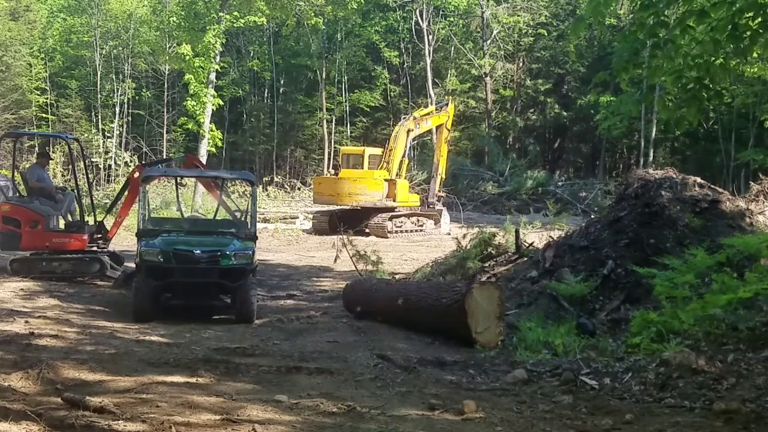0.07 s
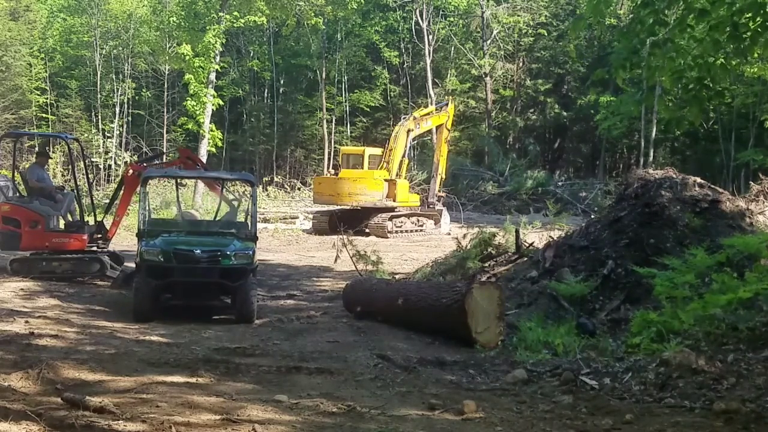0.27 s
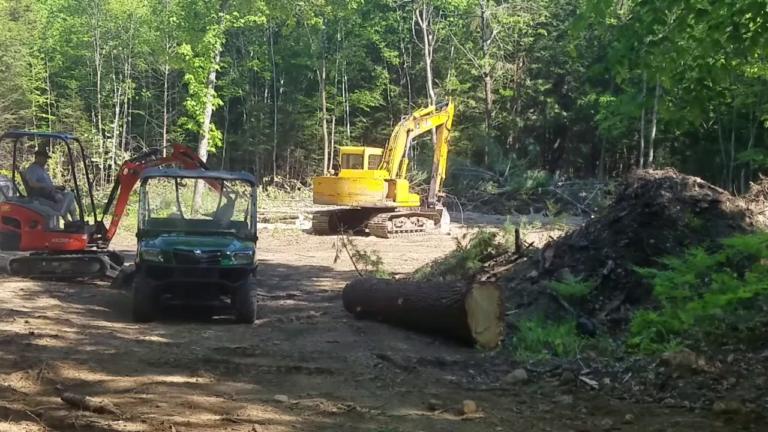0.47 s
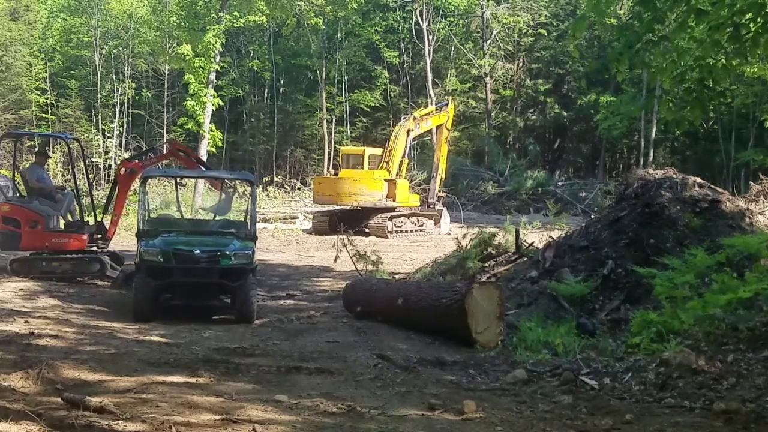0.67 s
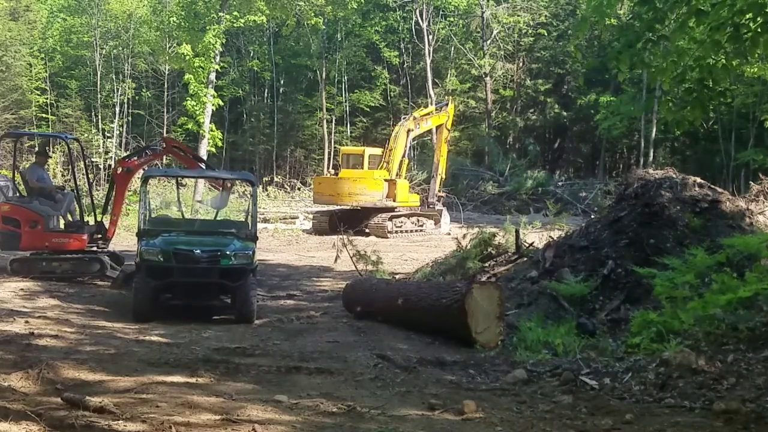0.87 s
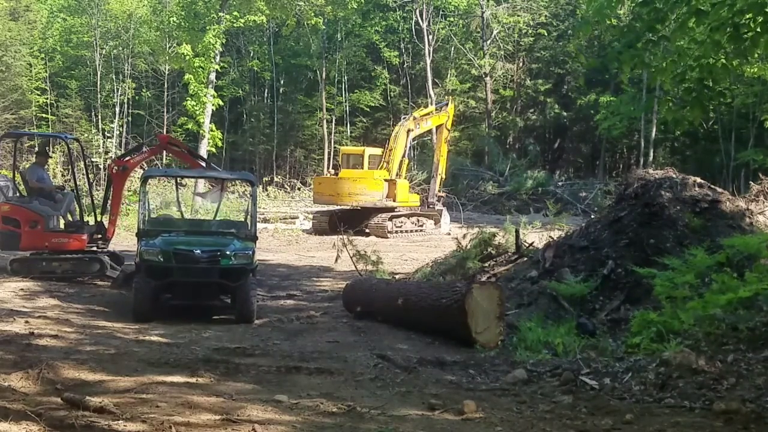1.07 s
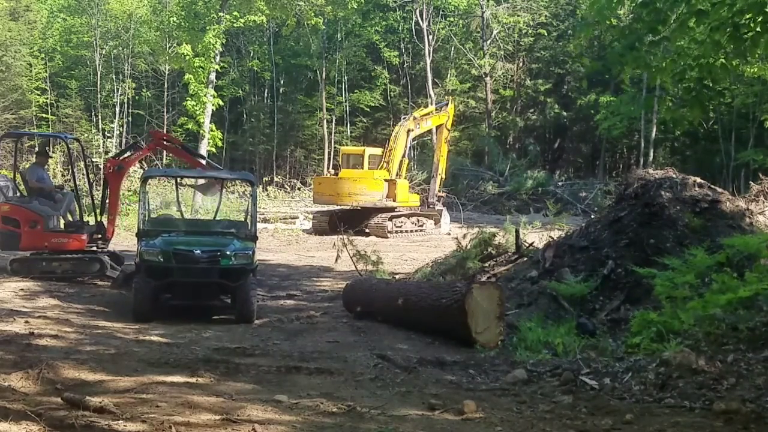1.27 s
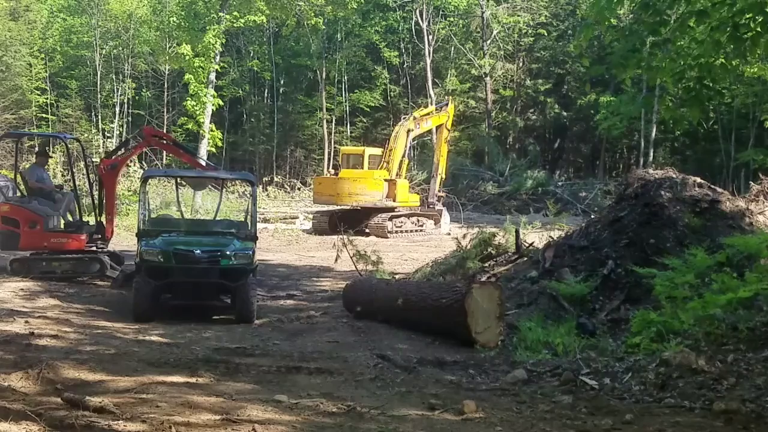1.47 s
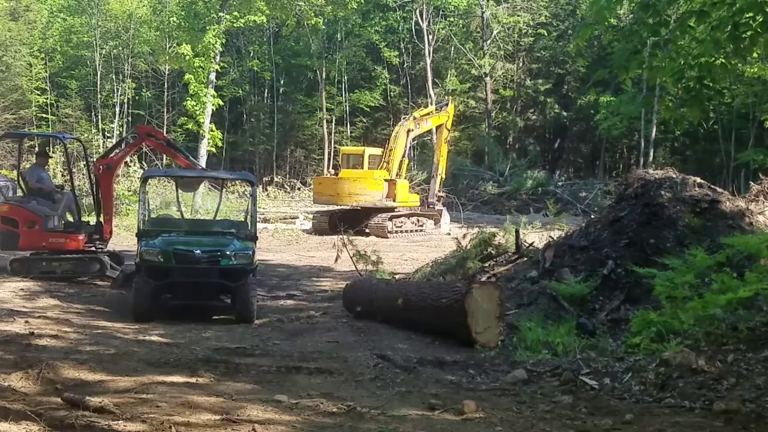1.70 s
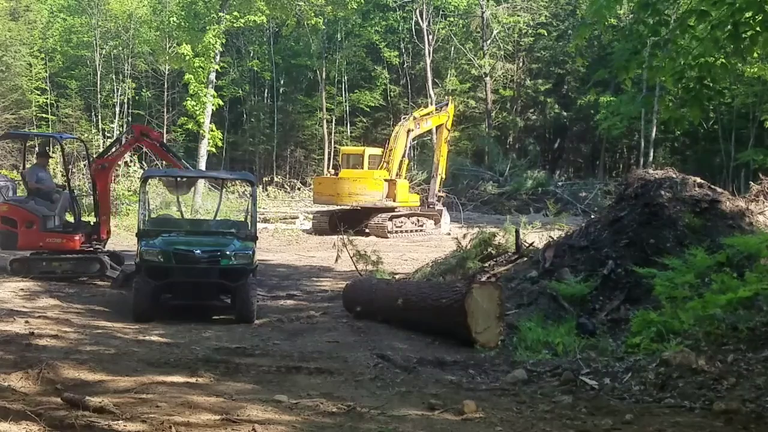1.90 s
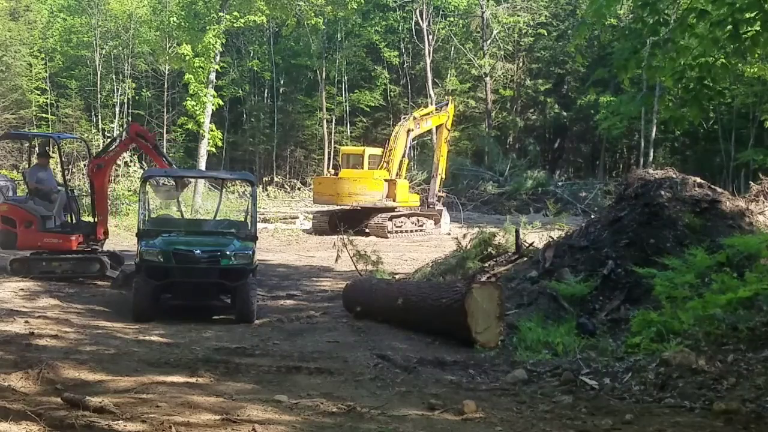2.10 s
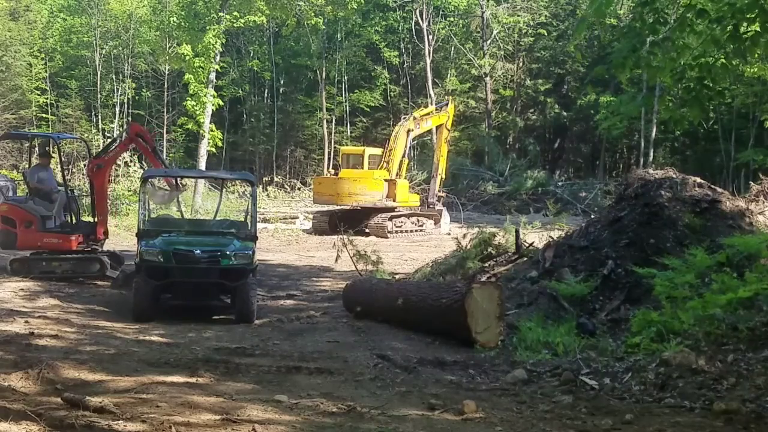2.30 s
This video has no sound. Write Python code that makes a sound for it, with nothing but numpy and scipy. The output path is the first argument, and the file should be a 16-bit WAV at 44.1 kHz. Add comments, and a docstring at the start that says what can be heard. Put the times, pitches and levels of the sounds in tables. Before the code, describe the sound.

A heavy log lands with a loud thud and weaker knocks, crushing brush. A few branches snap as it settles, while a diesel digger rumbles on in a forest clearing.

```python
"""A small diesel digger, off to the left in a forest clearing, drops a heavy log onto brush.
The log thuds, bounces and settles; branches crush and then snap one by one, and the trunks around scatter it all.
The engine runs on, sagging as the hydraulic pump takes up load; another idles further off."""
import sys
import numpy as np
from scipy import signal
from scipy.fft import rfft, irfft, next_fast_len
from scipy.io import wavfile
from scipy.ndimage import uniform_filter1d

SR = 44100
rng = np.random.default_rng(int(sys.argv[2]) if len(sys.argv) > 2 else 0)


def to_wav(sig):
    """Store sig (one row per channel, or 1-D mono) as 16-bit WAV at the path in sys.argv[1].

    Samples outside -1..1 are clipped; the rate is SR.
    """
    pcm = np.clip(np.atleast_2d(sig), -1, 1) * 32767
    pcm = np.round(pcm).astype(np.int16)
    wavfile.write(sys.argv[1], SR, pcm.T)  # frames by channels


N = 108045

# engine speed (s, firings per s)
SPEED = [(0, 65.6), (.55, 66.7), (.8, 63.3), (1.05, 63.5), (1.2, 64.6), (1.42, 63.7), (1.56, 61.4), (1.72, 60), (1.95, 59.8), (2.15, 61), (2.32, 58.5), (2.45, 57)]
# exhaust tones (multiple of the firing rate, dB)
EXHAUST = [(1, -42.5), (3, -37.5)]
# level of the second and fourth exhaust tones (s, dB, dB)
BOOM = [(0, -34.5, -36.5), (.6, -34.5, -32), (.82, -40.5, -38), (1.06, -32.5, -48), (1.2, -36.5, -33.5), (1.4, -30, -32), (1.55, -36, -31), (1.72, -33, -47.5), (1.9, -34.5, -31), (2.18, -31, -29.5), (2.29, -41, -38), (2.45, -37, -51)]
# hydraulic pump whine (s, dB)
PUMP = [(0, -68), (1.35, -68), (1.6, -47), (2.1, -45), (2.26, -53.5), (2.45, -49.5)]
PUMP_ORDER = 20 / 3  # fixed
# soft rumble of the exhaust, and the clatter of the block (Hz, dB per Hz)
RUMBLE = [(20, -5), (50, -2.5), (80, -2), (110, -4), (145, 1), (190, 2.5), (260, -1.5), (340, -2), (450, -13.5), (700, -27), (1500, -43)]
CLATTER = [(200, 1), (450, -1.5), (580, -13.5), (670, 7.5), (780, -6.5), (1030, 5.5), (1400, -8.5), (1600, 0.5), (2000, -5.5), (2900, -16), (4500, -15.5), (6500, -19), (11000, -19), (14000, -16.5)]
# tones of the far engine (multiple of its firing rate, dB)
IDLE = [(1, -45.5), (2, -46), (3, -49)]
IDLE_HZ = 51.26
# the log's blows (s, log dB, ground dB, pitch ratio of the spot that strikes)
BLOWS = [(.117, -7.5, -27.5, 1.015), (.140, -15.5, -15.5, 1.1), (.158, -15, -16, 1.18), (.198, -9.5, -19.5, .92), (.240, -10.5, -11.5, 1.02), (.285, -17, -19.5, 1.05), (.328, -22, -16, 1), (.375, -22, -28.5, 1.03), (0.441, -20, -28, .98), (0.516, -21.5, -17, 1), (0.621, -33.5, -22.5, 1.08), (.978, -30.5, -27, 1.15)]
# boom that the clearing returns (Hz, dB per Hz)
THUD_ECHO = [(30, -35.5), (60, -21), (85, 1), (150, -4.5), (240, 4), (330, -9.5), (430, -17.5), (550, -21.5), (800, -48.5), (2000, -58)]
SINK_S, THUD_BUILD_S = 0.0052, 0.013  # the log sinks into the brush; the boom builds up
# modes of the ground and of the log (Hz, dB, t60 s)
GROUND_MODES = [(88.8, -11.5, 0.51), (114.3, -3.5, 0.28)]
LOG_MODES = [(183.4, -9.5, 0.36), (239.2, 3, 0.16), (287.7, -5, 0.16), (332.5, -10, 0.22), (404, -21, 0.13), (519.3, -19, 0.21), (633.5, -22.5, 0.17)]
THUD_DB, THUD_ECHO_DB, THUD_T60_S = 2.5, -7, 0.92
# breaking branches (s, dB, level of the woody body dB)
SNAPS = [(0.132, -14.5, 8.5), (.165, -12, -2), (.222, -21, 0.5), (0.288, -21.5, 7.5), (0.619, -34, -9), (0.743, -37.5, -8.5), (.836, -16.5, -2), (0.987, -23.5, -25), (1.162, -20.5, -23), (1.406, -32, -19)]
# sharp crack and woody body of a snap (Hz, dB per Hz)
CRACK = [(300, -23.5), (1200, 5.5), (2000, 3), (2900, -2), (4400, 2.5), (6200, 0.5), (8000, 1.5), (11000, -10.5), (13000, -10.5), (16000, -15)]
WOOD = [(100, -16), (300, 20.5), (520, 7), (780, 0), (1030, 10), (1400, -14), (1900, -1.5), (2900, -6), (6000, -38), (14000, -43)]
SNAP_DB, SPLINTER_S, SPLINTERS_PER_S = 22, 0.042, 1800
# weight of the log on the brush (s, dB)
CRUSH = [(0, -41), (.05, -37.5), (.115, -37.5), (.15, -22.5), (.24, -25), (.33, -27), (.43, -30), (.53, -31.5), (.63, -40), (.72, -38.5), (.9, -39), (1.05, -49.5), (1.15, -53), (1.5, -61.5), (2.45, -76.5)]
BRUSH = [(150, -12), (350, 1.5), (520, 1), (780, -3.5), (1030, 1.5), (1400, -7), (2000, -5.5), (2900, -16), (4500, -14.5), (6500, -19), (11000, -30), (15000, -45)]
TWIGS_PER_S = 900
# thin metallic rings as the log shifts (s, Hz, dB)
RING_SWELL_S, RING_T60_S = 0.026, 0.52
# colour of the two microphones (Hz, left dB, right dB)
MICS = [(20.5, -3.5, -10.5), (101, 2.04, 5), (194, 0.34, -0.9), (716, -0.5, 5), (2320, 1, -0.5), (4300, -0.5, 3.5), (5180, 0.5, 2.5), (6330, 5, -7.5), (7300, -6.5, -13), (7830, -11.5, -30), (8740, -27, -35), (10000, -2.5, -22), (10730, 2, -9), (12400, -10.5, -27), (14500, -21, -13)]
PORT_LAG_S = 0.00036
TOP_HZ = 14500  # fixed
RUMBLE_DB, RUMBLE_PULSE, CLATTER_DB, CLATTER_PULSE = -36.5, 0.35, -45.5, 0.049
RINGS = [(0.594, 4520, -47.5), (0.999, 4550, -52), (1.18, 4443, -44), (1.415, 4480, -50)]
FOREST_T60_S, FOREST_BUILD_S, FOREST_HOLD_S, FOREST_GRAIN, DIRECT_DB = 0.53, 0.0046, 0.05, 0.53, -11
SHARED_HZ = 550  # below this the two close microphones hear the same wave


def undb(db):
    return 10 ** (np.asarray(db) / 20)


def unit(x):
    return x / np.sqrt(np.mean(x ** 2))


def curve(table, axis=1):
    """A column of a table, joined by straight lines in time."""
    rows = np.array(table, float)
    return np.interp(np.arange(N) / SR, rows[:, 0], rows[:, axis])


def colour(x, table, axis=1):
    """Causal filter through (Hz, dB) points."""
    rows, size = np.array(table, float), next_fast_len(2 * N)
    size += size % 2
    hz = np.maximum(np.arange(size // 2 + 1) * SR / size, 1)
    cep = irfft(np.log(undb(np.interp(np.log(hz), np.log(rows[:, 0]), rows[:, axis]))))
    cep[1:size // 2] *= 2
    cep[size // 2 + 1:] = 0
    return irfft(rfft(x, size) * np.exp(rfft(cep)))[..., :N]


def convolve(x, response):
    return signal.fftconvolve(np.atleast_2d(x), np.atleast_2d(response), axes=1)[:, :N]


def walk(rate):
    """Smooth random wander with a spread near 1."""
    k = int(SR / rate)
    return unit(uniform_filter1d(uniform_filter1d(np.repeat(rng.standard_normal(N // k + 1), k), k), k)[:N])


def from_left(x):
    """The sound reaches the right microphone a little later."""
    t = np.arange(N) / SR
    return np.array([x, np.interp(t - PORT_LAG_S, t, x, left=0)])


def echoes(t60, channels=2):
    """Countless reflections from trunks that build up, hold and die away; unit energy."""
    t = np.arange(N) / SR
    tail = rng.standard_normal((channels, N)) * np.exp(FOREST_GRAIN * rng.standard_normal((channels, N)))
    return unit(tail * (1 - np.exp(-t / FOREST_BUILD_S)) * undb(-60 * np.maximum(t - FOREST_HOLD_S, 0) / t60)) / np.sqrt(N)


def forest(x):
    """A weak direct path and the scatter from the trees."""
    return undb(DIRECT_DB) * from_left(x) + convolve(x, echoes(FOREST_T60_S))


def clicks(rate, spread_db):
    """Random fractures of uneven size; rms 1."""
    return unit((rng.random(N) < rate / SR) * rng.choice([-1, 1], N) * undb(spread_db * np.clip(rng.standard_normal(N), -2, 2)))


def digger():
    """Exhaust tones, soft puffs of gas, pump whine and clatter that pulses with each firing."""
    turns = np.cumsum(curve(SPEED) * (1 + 0.0031 * walk(19.94))) / SR
    tone = lambda k, db: np.sqrt(2) * undb(db + 1.5 * walk(22)) * np.sin(2 * np.pi * (k * turns + rng.random()))
    tones = sum(tone(k, db) for k, db in EXHAUST) + tone(2, curve(BOOM)) + tone(2 * 2, curve(BOOM, axis=2)) + tone(PUMP_ORDER, curve(PUMP))
    firings = (1 + RUMBLE_PULSE * np.cos(2 * np.pi * turns)) * rng.standard_normal(N)
    rumble = undb(RUMBLE_DB) * unit(colour(firings, RUMBLE))
    hiss = rng.standard_normal((2, N)) + 0.31 * from_left(rng.standard_normal(N))
    clatter = unit(colour(hiss * (1 + CLATTER_PULSE * np.cos(2 * np.pi * turns)), CLATTER)) * undb(CLATTER_DB + 1.1 * walk(13.5))
    return from_left(tones + rumble) + clatter


def log_thud():
    """Each blow swells into the modes of log and ground; the clearing answers with a dense boom."""
    t, thud, power = np.arange(N) / SR, np.zeros(N), np.zeros(N)
    for start, log_db, ground_db, pitch in BLOWS:
        age = np.maximum(t - start, 0)
        swell = 1 - np.exp(-(age / SINK_S) ** 2)
        for modes, blow_db in ((LOG_MODES, log_db), (GROUND_MODES, ground_db)):
            thud += swell * sum(undb(blow_db + db - 60 * age / t60) * np.sin(2 * np.pi * hz * pitch * age) for hz, db, t60 in modes)
        power += (undb(log_db - 60 * age / THUD_T60_S) * (1 - np.exp(-age / THUD_BUILD_S))) ** 2
    scatter = from_left(rng.standard_normal(N)) + undb(-28.5) * rng.standard_normal((2, N))
    boom = np.sqrt(power) * unit(colour(scatter, THUD_ECHO))
    return undb(THUD_DB) * from_left(thud) + undb(THUD_ECHO_DB) * boom


def branches():
    """Each snap is a short run of splintering fibres and its scatter from the trees, with a sharp crack and a woody body."""
    t, crack, body = np.arange(N) / SR, np.zeros((2, N)), np.zeros((2, N))
    fibres = clicks(SPLINTERS_PER_S, spread_db=7)
    for start, db, body_db in SNAPS:
        splinters = unit(fibres * (t >= start) * np.exp(-np.abs(t - start) / SPLINTER_S)) / np.sqrt(N)
        scatter = np.roll(echoes(FOREST_T60_S), int(start * SR), axis=1) * (t >= start)
        burst = undb(db + SNAP_DB) * (undb(DIRECT_DB) * from_left(splinters) + scatter)
        crack, body = crack + burst, body + undb(body_db) * burst
    return colour(crack, CRACK) + colour(body, WOOD)


def brush():
    """Twigs and bark crackle under the weight of the log."""
    return forest(unit(colour(clicks(TWIGS_PER_S, spread_db=5.0), BRUSH)) * undb(curve(CRUSH)))


def metal_ring():
    """Faint high rings, perhaps from the grapple, that swell and flutter among the trees."""
    t, out = np.arange(N) / SR, np.zeros((2, N))
    for start, hz, db in RINGS:
        age = np.maximum(t - start, 0)
        ring = (1 - np.exp(-age / RING_SWELL_S)) * undb(db - 60 * np.maximum(age - FOREST_HOLD_S, 0) / RING_T60_S)
        out += [ring * undb(2.5 * walk(120)) * np.sin(2 * np.pi * hz * age + 0.98 * walk(130)) for _ in range(2)]
    return out


def far_engine():
    """A second engine idles further off and beats against the first."""
    turns = np.cumsum(IDLE_HZ * (1 + 0.0055 * walk(7.5))) / SR
    tones = [np.sqrt(2) * undb(db + 4.2 * walk(9.97)) * np.sin(2 * np.pi * (k * turns + rng.random())) for k, db in IDLE]
    return from_left(sum(tones))


def close_pair(x):
    """Long waves reach both microphones alike; short ones differ."""
    low = signal.sosfiltfilt(signal.butter(2, SHARED_HZ, fs=SR, output="sos"), x)
    return x - low + from_left(low[0])


def scene():
    """Engines, log and brush together."""
    return close_pair(digger() + branches() + brush()) + far_engine() + log_thud() + metal_ring()


def record(dry):
    """Each microphone has its own colour; the top is cut."""
    heard = np.array([colour(dry[0], MICS), colour(dry[1], MICS, axis=2)])
    return signal.sosfilt(signal.ellip(8, .2, 70, TOP_HZ, fs=SR, output="sos"), heard)  # fixed


dry = scene()
out = record(dry)
to_wav(out)
```